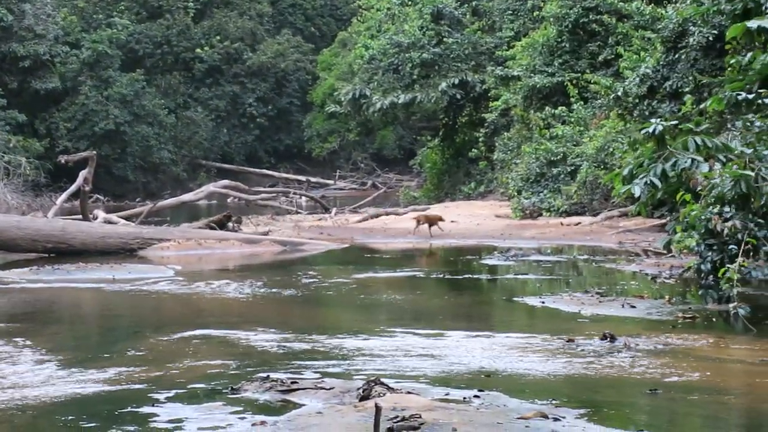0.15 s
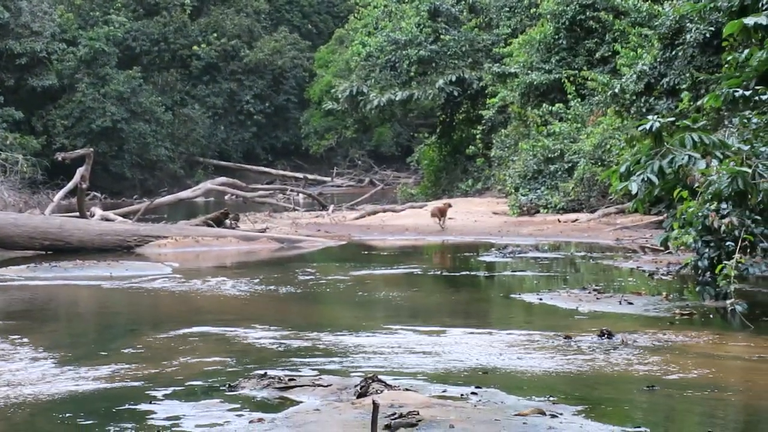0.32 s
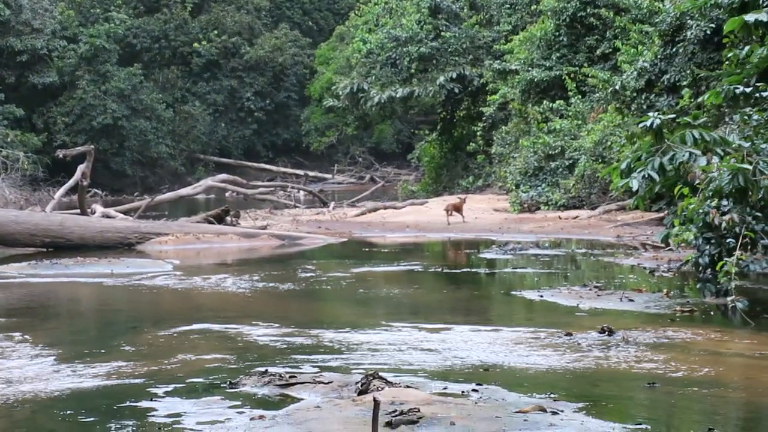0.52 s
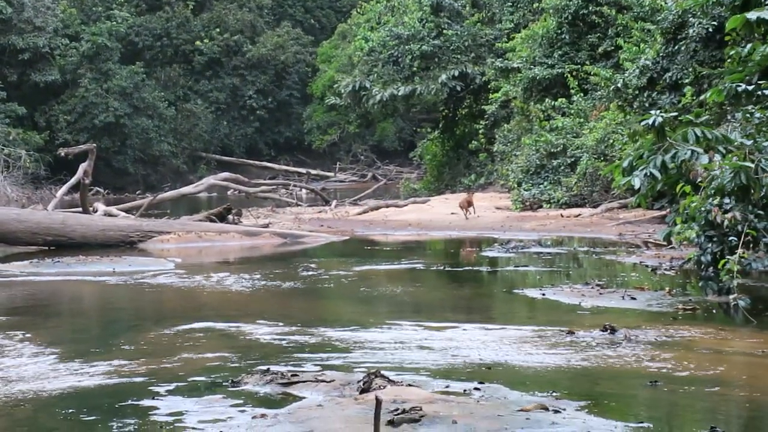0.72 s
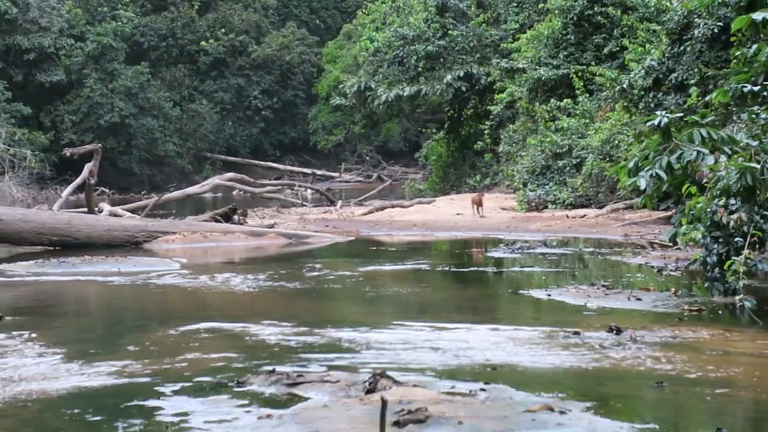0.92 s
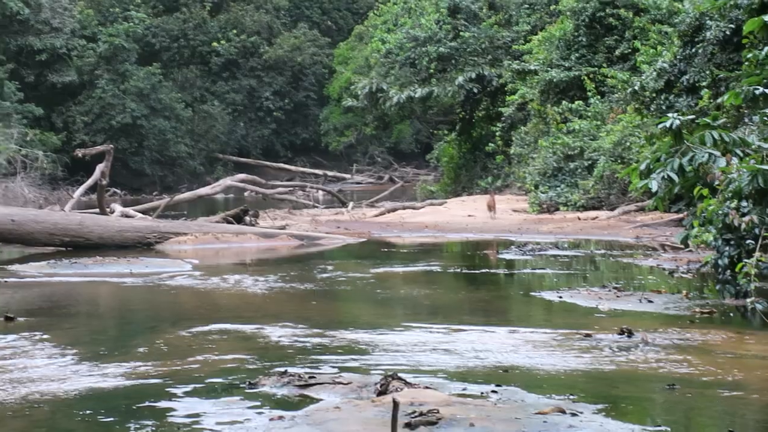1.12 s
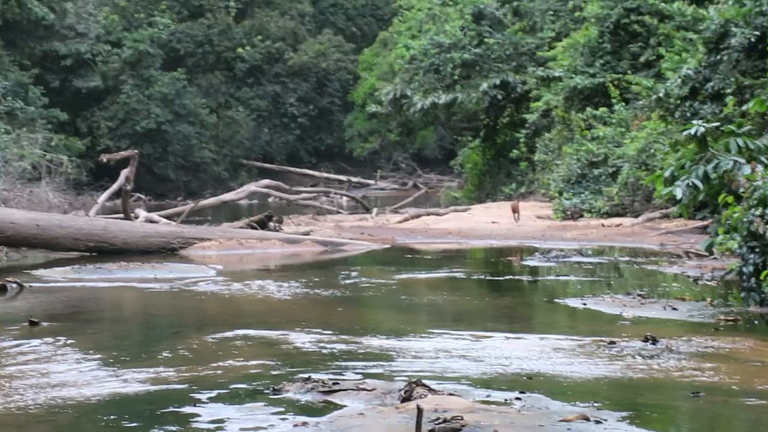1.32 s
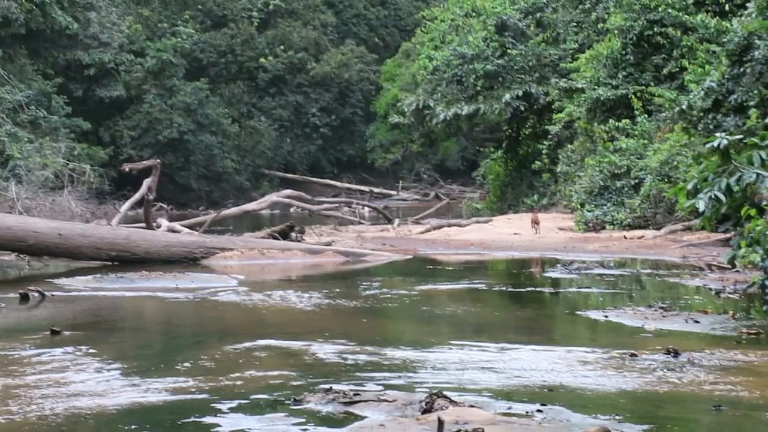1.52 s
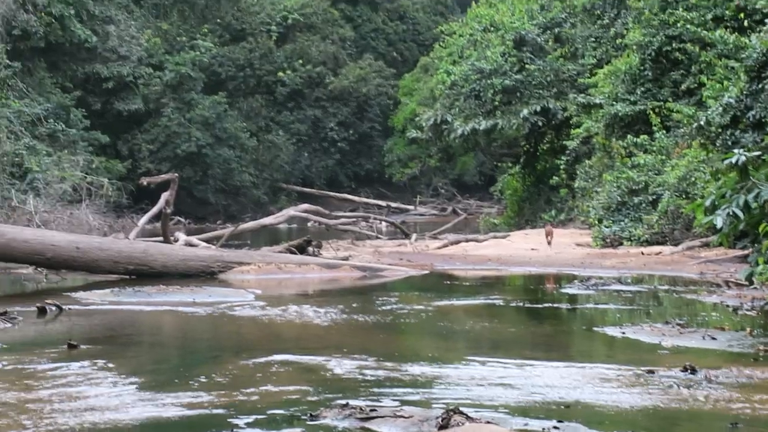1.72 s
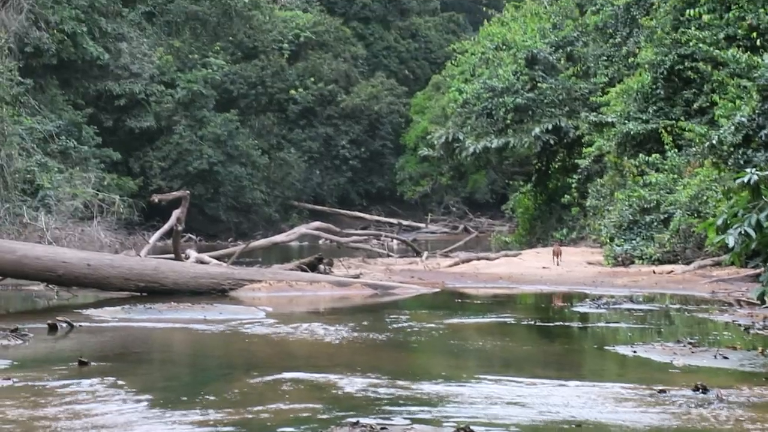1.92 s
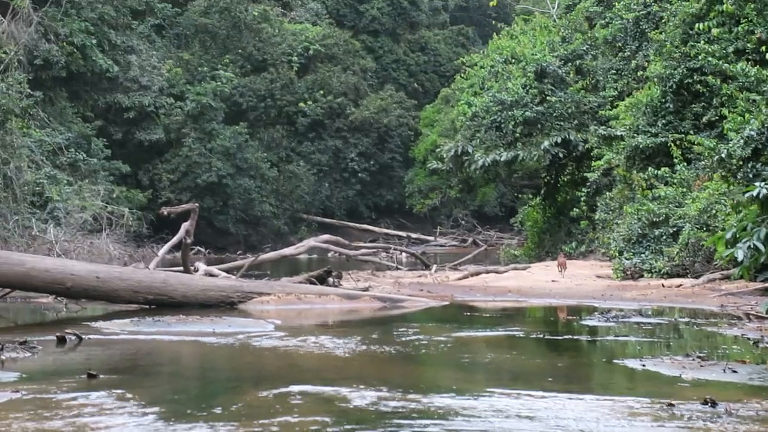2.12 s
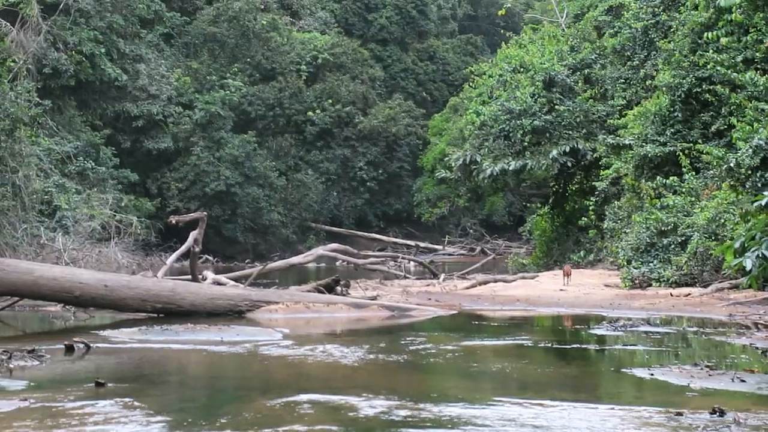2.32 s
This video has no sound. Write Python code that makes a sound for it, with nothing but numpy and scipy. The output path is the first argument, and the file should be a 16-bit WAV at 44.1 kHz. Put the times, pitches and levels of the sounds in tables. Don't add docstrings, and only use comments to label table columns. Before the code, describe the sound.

Cicadas and crickets drone shrilly over a softly flowing forest river, interrupted by one loud overloaded pop.

```python
import sys
import numpy as np
from scipy import signal
from scipy.fft import rfft, irfft, next_fast_len
from scipy.io import wavfile
from scipy.ndimage import uniform_filter1d, map_coordinates

SR = 44100
rng = np.random.default_rng(int(sys.argv[2]) if len(sys.argv) > 2 else 0)


def log_audio(samples):
    frames = np.atleast_2d(samples).T
    limited = np.clip(frames, -1, 1)
    pcm = np.round(limited * 32767).astype(np.int16)
    wavfile.write(sys.argv[1], SR, pcm)


def attenuation_scalar(level_db):
    decades = np.asarray(level_db, float) / 20
    return 10 ** decades


N = 105840

# pitch in Hz, width in Hz, level in dB, clicks per second, swell in dB.
CHOIR_ROWS = [(7496, 580, -50, 6100, 1.4), (7848, 930, -52, 2800, -1.54), (6300, 200, -62, 1600, -0.2),
              (8980, 220, -61.5, 2200, 1.5), (5866, 150, -69, 900, 0.5), (5100, 70, -74.5, 900, 1.5),
              (2810, 110, -72.5, 1100, 0.5), (1180, 70, -73, 350, 2.5), (530, 50, -74.5, 730, 3)]
# start in seconds, length in seconds, pitch in Hz, width in Hz, level in dB.
CRICKET_TRILL = (1.36, 0.03, 4403.5, 236, -59)
# frequency in Hz, level in dB per Hz.
FAR_INSECTS = [(4800, -120), (5500, -11), (6800, -0.5), (8400, -2), (9300, -6), (9700, -39.5), (16000, -42)]
# start in seconds, length in seconds, level in dB.
CICADA_PHRASES = [
    (-.3, 0.36, -46.5),
    (.68, 0.41, -46.5),
    (1.66, 0.34, -50.5),
    (2.3, .3, -55),
]
# time in seconds, level in dB.
RIVER_FLOW = [(0, -57.5), (.2, -54.5), (0.601, -57), (1.2, -57), (1.701, -59.5), (2.4, -58)]
# frequency in Hz, level in dB per Hz.
RIVER_COLOUR = [(25, -30), (60, -13.5), (117, -9), (341, -1.5), (520, -6), (1080, -5), (3300, -11),
                (5400, -12.5), (7000, -32.5), (9000, -120)]
# start in seconds, length in seconds, first pitch in Hz, last pitch in Hz, level in dB.
BUBBLE_POPS = [
    (-.005, 0.037, 780, 2220, -51),
    (0.041, 0.015, 2310, 2410, -56.5),
    (0.055, .02, 2525, 2900, -60),
    (0.059, 0.0081, 654, 700, -58),
    (0.28, 0.013, 1450, 1930, -58),
    (0.308, 0.15, 3430, 3530, -65),
    (0.732, 0.022, 2750, 2880, -60),
]
# frequency in Hz, level in dB per Hz.
BREEZE_COLOUR = [(15, -8.5), (40, -7), (85, 0.5), (200, -9), (500, -19.5), (900, -120)]
# start in seconds, level in dB, pulse gap in seconds, each gap holding three pulses.
FROG_CLICKS = [
    (0.169, -36.5, .0042),
    (0.6439, -26, 0.0048),
    (0.8044, -27, .0039),
]
# pitch in Hz, width in Hz, level in dB.
FROG_THROAT = [(360, 60, 2), (570, 50, 2.5), (990, 110, -0.5), (1650, 200, -1.5), (2122, 200, 0.5),
               (2600, 150, 6.5), (2900, 220, 2), (3640, 350, 0)]
# strength relative to full scale, time constant in ms.
DROP_PUSHES = [
    [(-477, .0999), (-85.51, 2.6407), (66.47, 6.0543)],
    [(23.58, 1.4809), (-77.79, 3.2183), (67.08, 6.9247)],
]
# frequency in Hz, correlation from -1 to 1.
STEREO_LIKENESS = [(60, 0.75), (270, 0.99), (740, .65), (1300, -0.11), (2000, 0), (3500, -.15),
                   (6000, -.05), (9000, -0.42)]
# frequency in Hz, left over right in dB.
STEREO_BALANCE = [(60, 0), (500, 0.5), (9000, 2.5)]

HALF_EACH = np.array([[0.5], [-0.5]])
DROP_S = 0.220398


def unit(x):
    return x / np.sqrt(np.mean(x ** 2) + 1e-20)


def along(points, hz):
    f, v = np.transpose(points)
    return np.interp(np.log(hz + 1), np.log(f + 1), v)


def wobble(rate):
    knots = rng.standard_normal(int(N * 200 / SR) + 9)
    return map_coordinates(knots, [np.arange(N) * min(rate, 200) / SR])


def filtered(x, response):
    m = next_fast_len(N + SR // 2)
    return irfft(rfft(x, m) * response(np.fft.rfftfreq(m, 1 / SR)), m)[..., :N]


def peak(f, hz, width_hz):
    return 1j * f * width_hz / (hz * hz - f * f + 1j * f * width_hz)


def swell(start, length, edge):
    t = np.arange(N) / SR
    to_nearest_end = np.minimum(t - start, start + length - t)
    return np.sin(np.pi / 2 * np.clip(to_nearest_end / edge, 0, 1)) ** 2


def spread(pair):
    def shares(hz):
        turn = np.arccos(np.clip(along(STEREO_LIKENESS, hz), -1, 1)) / 2
        return np.array([np.cos(turn), np.sin(turn)])

    mid, side = filtered(pair, shares)
    ears = np.array([mid + side, mid - side])
    return filtered(ears, lambda hz: attenuation_scalar(along(STEREO_BALANCE, hz) * HALF_EACH))


def rush(spectrum, patchy_db):
    z = signal.stft(rng.standard_normal((2, N)), nperseg=512)[2]
    field = uniform_filter1d(rng.standard_normal(z.shape[1:]), 5, 0)
    field = uniform_filter1d(field, 10, 1)
    pair = signal.istft(z * attenuation_scalar(patchy_db * unit(field)), nperseg=512)[1][:, :N]
    return unit(filtered(pair, lambda hz: attenuation_scalar(along(spectrum, hz))))


def choir(hz, width_hz, rate):
    clicks = (rng.random((2, N)) < rate / SR) * rng.standard_normal((2, N))
    return unit(filtered(clicks, lambda f: peak(f, hz, width_hz) ** 2 / (1 + (f / 9400) ** 80)))


def insects():
    out = np.zeros((2, N))
    for hz, width_hz, db, rate, swell_db in CHOIR_ROWS:
        level_db = db + swell_db * (wobble(5) + 0.6 * wobble(30))
        out += attenuation_scalar(level_db) * choir(hz, width_hz, rate)
    start, length, hz, width_hz, db = CRICKET_TRILL
    trill = attenuation_scalar(db) * swell(start, length, 0.093) * choir(hz, width_hz, rate=2700)
    haze = attenuation_scalar(-59.5) * rush(FAR_INSECTS, patchy_db=-2.5)
    return out + trill + haze


def cicada():
    start_hz, end_hz, body_hz, blur_hz = 7130, 7330, 64.8, 30.13
    t, out = np.arange(N) / SR, np.zeros((2, N))
    lines = 7058 + 131 * np.arange(4)[:, None]
    blur = np.array([[wobble(blur_hz) + 1j * wobble(blur_hz) for _ in lines] for _ in range(2)])
    buzz = (blur * np.exp(2j * np.pi * lines * t)).real
    for start, length, db in CICADA_PHRASES:
        hz = start_hz + (end_hz - start_hz) * np.clip((t - start) / (1.01 * length), 0, 1)
        lit = np.exp(-((lines - hz) / body_hz) ** 2 / 2)
        out += attenuation_scalar(db) * swell(start, length, 0.056) * np.sum(buzz * lit, axis=1)
    return out


def bubbles():
    t, pops = np.arange(N) / SR, np.zeros(N)
    for start, length, low_hz, high_hz, db in BUBBLE_POPS:
        climb = np.clip((t - start) / length, 0, 1) ** 2.0
        hz = low_hz * (high_hz / low_hz) ** climb
        pops += attenuation_scalar(db) * swell(start, length, 0.33 * length) * np.sin(2 * np.pi * np.cumsum(hz) / SR)
    return pops * attenuation_scalar([[1], [-1]])


def river():
    s, db = np.transpose(RIVER_FLOW)
    level_db = np.interp(np.arange(N) / SR, s, db) + 0.7 * wobble(3) + 0.23 * wobble(14)
    return spread(attenuation_scalar(level_db) * rush(RIVER_COLOUR, patchy_db=2)) + bubbles()


def breeze():
    ends_s = 0.56
    level = attenuation_scalar(-63 + 2 * wobble(8.6)) * swell(-1, 1 + ends_s, 0.02)
    return spread(level * rush(BREEZE_COLOUR, patchy_db=-2.0))


def throat(f):
    total = sum((-1) ** k * attenuation_scalar(db) * peak(f, hz, width_hz)
                for k, (hz, width_hz, db) in enumerate(FROG_THROAT))
    return total / (1 + 1j * f / 5000) ** 3


def frog():
    pulse_fade_db, lag_s, pan_db = 3, 0.00014, 7.5
    bank_db, bank_t60 = -1, 0.07
    pulses = np.zeros(N)
    k = np.arange(9) / 3
    for start, db, gap in FROG_CLICKS:
        jitter, size = rng.standard_normal((2, 9))
        when = start + gap * (k + 0.12 * jitter * (k > 0))
        pulses[np.round(when * SR).astype(int)] = attenuation_scalar(db + 16.5 - pulse_fade_db * k) * size
    call = filtered(pulses, throat)
    near = filtered(call, lambda f: np.exp(2j * np.pi * f * lag_s * HALF_EACH)) * attenuation_scalar(pan_db * HALF_EACH)
    t = np.arange(SR // 4) / SR
    tail = rng.standard_normal((2, len(t))) * attenuation_scalar(-60 * t / bank_t60)
    echo = signal.fftconvolve(call[None], tail / np.linalg.norm(tail[0]), axes=1)[:, :N]
    return near + attenuation_scalar(bank_db) * spread(filtered(echo, lambda f: 1 / (1 + 1j * f / 2000)))


def drop():
    rise_ms, rail = 0.344, 89.2
    ms = np.clip(np.arange(N) / SR - DROP_S, 0, None) * 1e3
    push = np.array([sum(a * np.exp(-ms / tau) for a, tau in port) for port in DROP_PUSHES])
    push = push * (1 - np.exp(-(ms / rise_ms) ** 2))
    x = push / (1 + np.abs(push / rail) ** 6) ** (1 / 6)
    for corner_hz in (208, 213.4):
        x = signal.lfilter(*signal.bilinear([1, 0], [1, 2 * np.pi * corner_hz], SR), x)
    late_sag = 0.0025 * (ms / 11) ** 3 * np.exp(-ms / 11)
    return x - late_sag


def scene():
    duck_db, climb_db_per_s, grab_s = 13, 9, 0.002
    after = np.arange(N) / SR - DROP_S
    gain_db = -np.clip(duck_db - climb_db_per_s * after, 0, None) * np.clip(after / grab_s, 0, 1)
    forest = spread(insects() + cicada()) + river() + breeze() + frog()
    return attenuation_scalar(gain_db) * forest + drop()


def band_limit(x):
    return signal.sosfilt(signal.butter(12, 16190, fs=SR, output="sos"), x)


def record(dry):
    clipped = dry / (1 + np.abs(dry) ** 11) ** (1 / 11)
    return band_limit(clipped)


dry = scene()
out = record(dry)
log_audio(out)
```